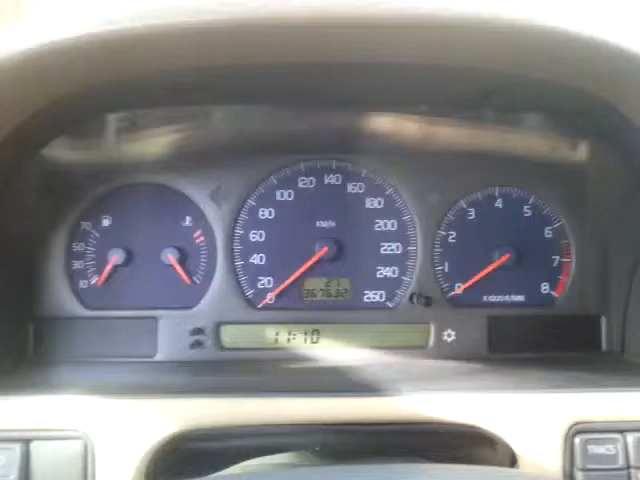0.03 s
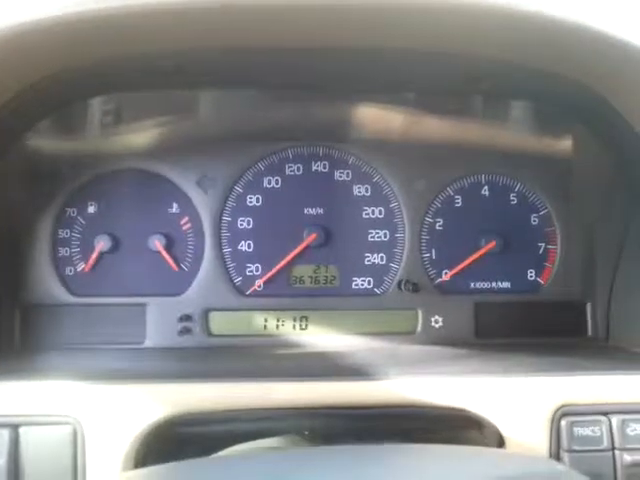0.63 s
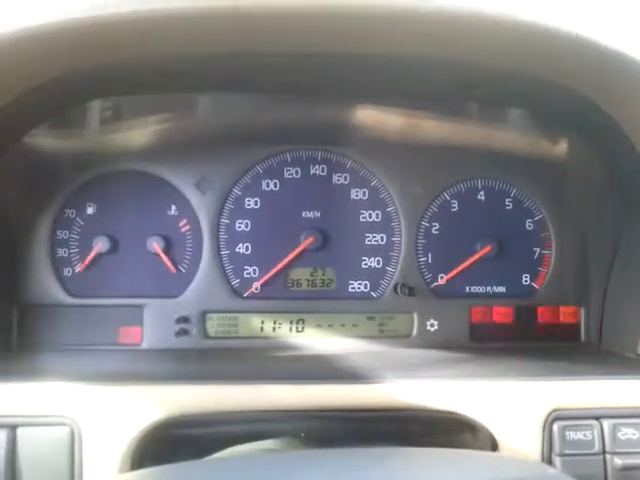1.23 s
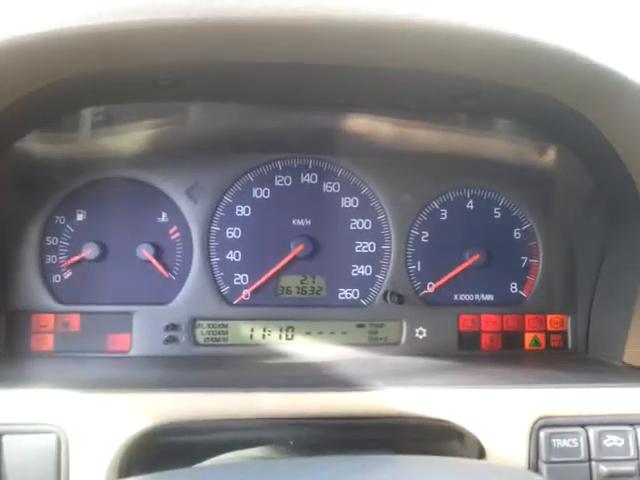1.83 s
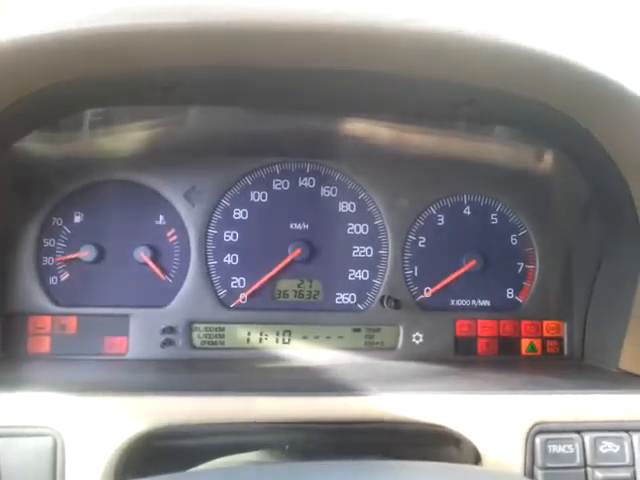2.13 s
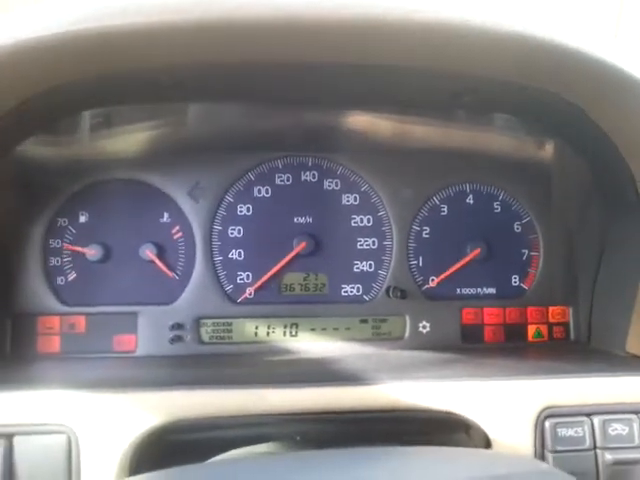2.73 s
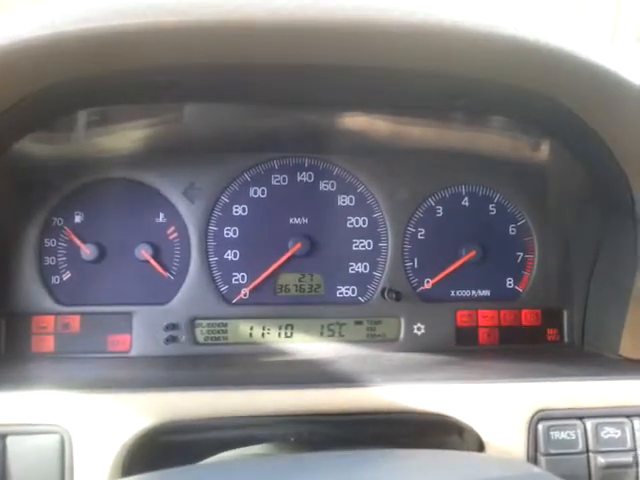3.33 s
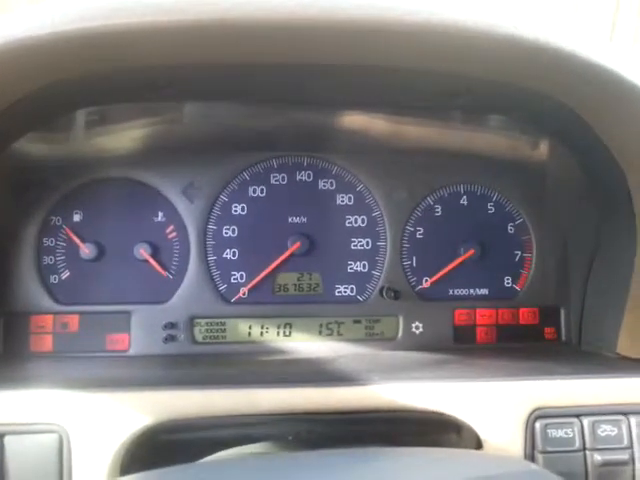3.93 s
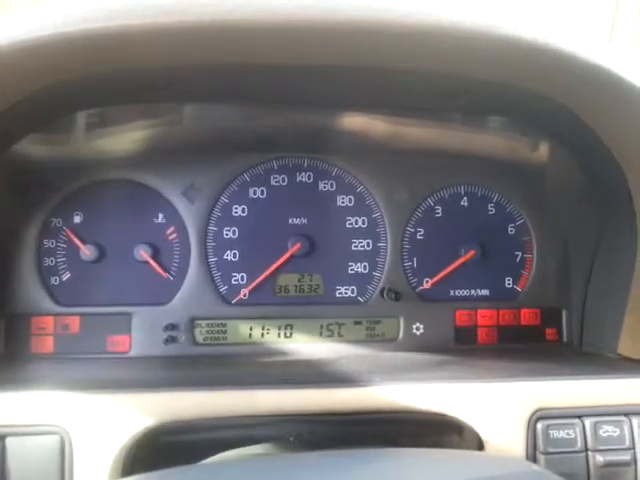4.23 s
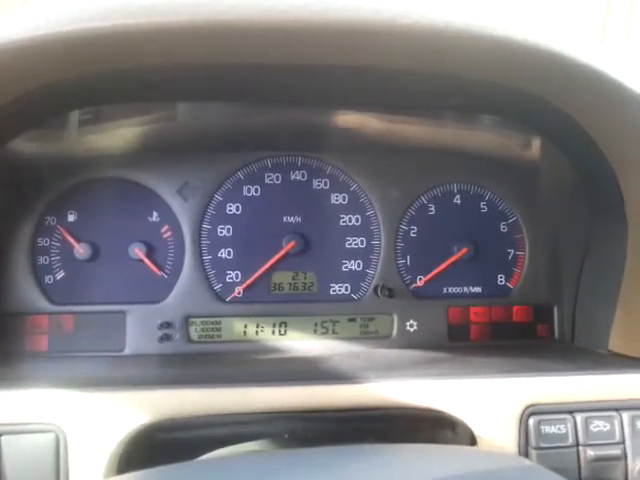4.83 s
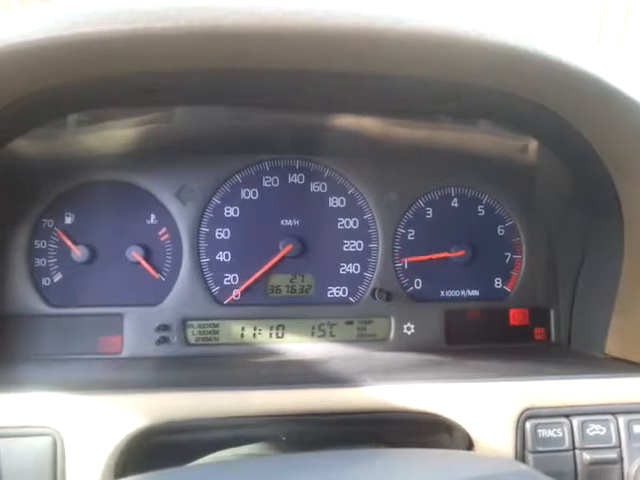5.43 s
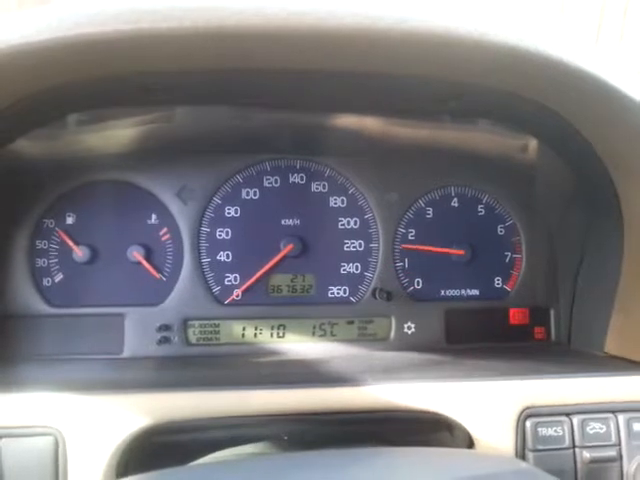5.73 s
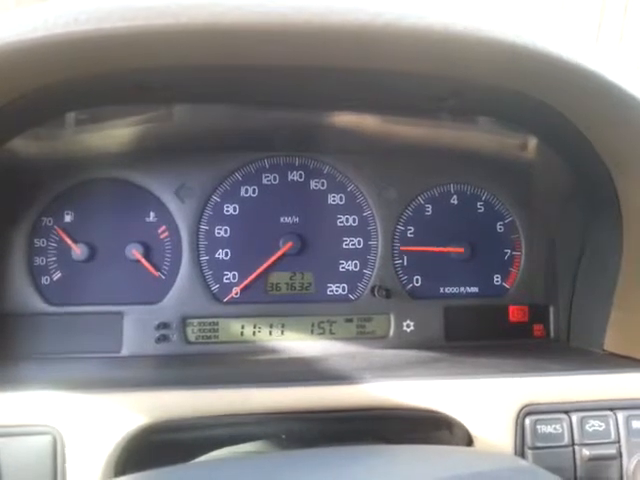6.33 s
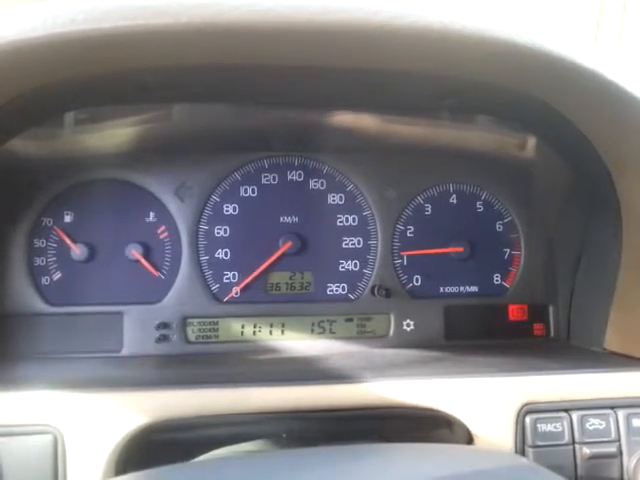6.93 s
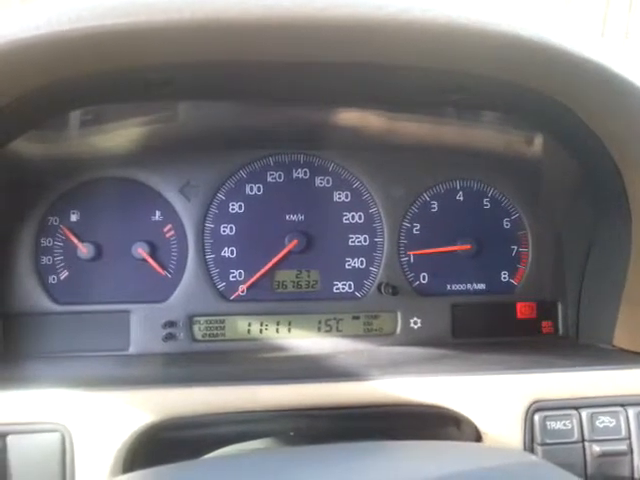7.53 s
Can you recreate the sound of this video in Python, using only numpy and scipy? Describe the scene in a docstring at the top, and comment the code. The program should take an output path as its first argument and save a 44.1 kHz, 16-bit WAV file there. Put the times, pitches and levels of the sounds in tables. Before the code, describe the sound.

Inside a closed car, over a faint low rumble, a key turns in the ignition with a quick run of sharp clicks and a small jingle, close and slightly left. A faint fuel pump whine, soft bumps and a light cloth rustle fill the pause. Then the starter clunks in and cranks briefly, and the petrol engine catches, flares with a low boom and sinks to a steady idle.

```python
"""Car start from the driver's seat

The ignition key turns through its detents, close by and brighter on the left; the key ring jingles.
The fuel pump primes. After a pause the starter engages and cranks; a five-cylinder petrol engine
catches, flares and sinks to a fast idle. The closed cabin booms as the firing harmonics glide
through its resonances."""
import sys
import numpy as np
from scipy import signal
from scipy.fft import rfft, irfft, next_fast_len
from scipy.io import wavfile
from scipy.ndimage import map_coordinates

SR = 44100
rng = np.random.default_rng(int(sys.argv[2]) if len(sys.argv) > 2 else 0)


def bounce(signal):
    """Save signal as a 16-bit WAV file at the path given by the first command-line argument."""
    frames = np.transpose(np.atleast_2d(signal))
    limited = np.clip(frames, -1, 1)
    pcm = np.round(limited * 32767).astype(np.int16)
    wavfile.write(sys.argv[1], SR, pcm)


N = 334278

STEREO_CORRELATION = [(150, 0.93), (350, 0.61), (700, 0.47), (1300, 0.0226), (3000, 0.014), (10000, 0.032)]  # cabin sound field: f/Hz, left-right correlation
LOCK_BALANCE = [(200, -3), (900, -1.5), (1300, 0.5), (2300, 10.5), (4300, 10), (14000, 12)]  # lock direction: f/Hz, left minus right/dB
ENGINE_BALANCE = [(200, -1), (700, -2), (1050, 1), (1400, 6.5), (2300, 8.5), (4300, 12), (9000, 3.5)]  # engine direction: f/Hz, left minus right/dB

OUTDOOR_SPECTRUM = [(18, -62), (30, -27), (75, -27), (94, -29), (113, -3.5), (131, -2.5), (147, -12),
                    (194, 1), (256, -7.5), (349, -2.5), (462, -12.5), (501, -11), (684, -7.5), (1500, -18),
                    (1950, -45), (3300, -120)]  # muffled rumble: f/Hz, density/dB
CABIN_MODES = [(115, 6.8, 0), (190.5, 8.1, -15), (299.4, 9.1, -6.5), (512, 12, -5), (888, 46, -11.5)]  # standing waves: f/Hz, width/Hz, gain/dB
HISS_SPECTRUM = [(880, -33), (1500, 0), (1600, -1), (2400, -3), (2760, -1), (3130, -2), (3610, -4.5),
                 (5660, -13.5), (13900, -9), (14700, -15.5)]  # background hiss: f/Hz, density/dB
HISS_ENVELOPE = [(3.4, -56), (3.9, -57), (4.5, -57.5), (6.0, -57)]  # hiss sinks slightly before the start: t/s, level/dB

# lock and starter drive contacts:
# t/s, level/dB, knock offset/dB, sheen offset/dB, ring f/Hz, ring offset/dB, t60/s
CLACK_HITS = [(0.9925, -35.5, 5, -14, 3600, -5.5, 0.0596), (1.006, -42, 10.5, -7, 3060, -10, 0.065),
              (1.018, -42, 11, -14, 1750, -6, 0.053), (1.036, -41, 4, -14, 2000, -3.5, 0.037),
              (1.052, -35.5, 4, -17, 4060, -9, 0.0406), (1.074, -40, 4, -10, 3100, -14, 0.027),
              (1.0943, -27, -2, -15, 3000, -16, 0.13), (1.1303, -22, 2.5, -4, 4170, -6, 0.11),
              (1.145, -18, 2.5, -8, 3720, -7, 0.064), (1.179, -22.5, -4, -12, 2980, -16, 0.05),
              (1.1837, -23, -5.5, -7, 2040, -14, 0.038), (1.21, -41.5, -14, 2, 2750, 1, 0.065),
              (1.2519, -27.5, -5.5, -10, 2850, -17, 0.0504), (1.2565, -29.5, -14.5, 2, 3350, -14, 0.055),
              (1.3348, -33.5, -5.5, -11.5, 3220, -12, 0.031), (1.3672, -53.5, 4.5, -8, 2700, -8, 0.033),
              (1.402, -41, 1.5, -6.5, 2030, -4.5, 0.05), (1.443, -51, 1, -2, 3530, -10, 0.074),
              (4.428, -39, -1.5, -16, 2200, -14, 0.08), (4.4484, -29.5, -0.5, -32, 3900, -8, 0.051),
              (4.4704, -30, -5, -29, 2150, -19, 0.094), (4.4815, -34, -12, -20, 2400, -17, 0.077),
              (4.4945, -38.5, -4, -17, 3580, -9, 0.05), (4.9065, -41.5, 7, -26, 2190, -16, 0.06),
              (5.0374, -36, 5, -9, 2080, -8, 0.25), (5.0751, -27.5, 2, -23, 2360, -9, 0.11),
              (5.1715, -31, 5.5, -10, 1250, -14, 0.046), (5.192, -28, -7, -8, 4170, -10.5, 0.056),
              (5.2515, -40.5, -1, -14, 2170, -4, 0.035)]
BARREL_MODES = [(2000, 590, 10), (2660, 640, 12), (3150, 620, 10), (3860, 400, 7), (4060, 196, 8.5),
                (4670, 1340, 4)]  # lock barrel: f/Hz, width/Hz, gain/dB
SHROUD_MODES = [(225, 210, -14.5), (378, 230, -5.5), (512, 38, 4), (660, 160, -2), (840, 130, -5),
                (952, 60, -2.5), (1267, 28.5, 3.5), (1416, 31, -5)]  # plastic column shroud: f/Hz, width/Hz, gain/dB
SHEEN_SPECTRUM = [(3500, -48), (5500, -1), (7200, 6), (8500, 3.5), (10500, 1), (14500, -2.5)]  # metallic sheen: f/Hz, density/dB
# steering lock gives; pinion slams in, settles, slips, snaps out: t/s, level/dB, f/Hz, t60/s
CLUNK_HITS = [(1.003, -31.5, 507, 0.094), (1.074, -32, 560, 0.018), (1.149, -20, 712, 0.052),
              (1.148, -46, 114, 0.3), (4.4595, -17, 572, 0.02), (4.525, -34.5, 310, 0.035),
              (4.907, -36.5, 236, 0.21), (5.075, -24.5, 912, 0.025), (5.129, -30, 820, 0.017),
              (5.153, -28, 1110, 0.014), (5.174, -18, 660, 0.019)]
KEY_HITS = [(1.189, -32.5), (1.209, -33), (1.256, -14)]  # hanging keys touch: t/s, level/dB
KEY_MODES = [(3150, -33, 0.052), (7760, -20, 0.059), (8310, -2.5, 0.052), (8400, -12, 0.061),
             (9650, -17, 0.04), (10400, -23, 0.04), (12600, -22, 0.035), (13340, -24, 0.06)]  # ringing key: f/Hz, level/dB, t60/s

SLEEVE_SWELLS = [(1.67, .08, -55.5), (2.884, 0.087, -57), (3.137, .02, -59), (3.25, 0.034, -57)]  # sleeve movements: crest t/s, half length/s, level/dB
SLEEVE_SPECTRUM = [(900, -25), (2000, 2), (3500, 0.5), (6000, -11.5), (9000, -7.5), (14000, -20)]  # sliding cloth: f/Hz, density/dB
FOOTWELL_HITS = [(1.957, -40.5), (1.969, -45), (2.338, -41.5), (2.35, -41), (2.89, -52), (3.636, -45)]  # soft bumps: t/s, level/dB
FOOTWELL_SPECTRUM = [(50, -45), (110, 5.5), (210, 3), (320, 0), (600, -11), (1500, -20), (3000, -27),
                     (7000, -51)]  # bump colour: f/Hz, density/dB
DASH_TICKS = [(3.238, -54.5, 7860), (3.54, -50, 3700), (3.557, -42.5, 2800), (3.634, -47, 2880),
              (3.685, -45.5, 2740), (3.9436, -45, 2630), (5.368, -46, 1800), (5.4755, -33, 1730),
              (5.47, -42, 3340), (5.545, -35, 2400), (5.8086, -53, 2200), (5.9634, -43.5, 3630)]  # dashboard, louder when the engine shakes it: t/s, level/dB, f/Hz

# starter spins up, labours against compression, is outrun, coasts: t/s, rotation/Hz
STARTER_SPEED = [(4.44, 40), (4.5, 90), (4.56, 120), (4.62, 138), (4.725, 151), (4.75, 135), (4.77, 121),
                 (4.8, 113), (4.88, 104), (4.94, 115), (5.2, 190), (5.5, 113)]
# loud on engaging, surges while cranking, swells as the engine catches, fades: t/s, level/dB
STARTER_ENVELOPE = [(4.44, -26.5), (4.5, -36.5), (4.56, -41.5), (4.68, -38.5), (4.775, -34), (4.84, -42),
                    (4.895, -43.5), (4.93, -35.5), (4.98, -36), (5.2, -31), (5.5, -49.5)]
WHINE_ORDERS = [(2, -3), (5, -1), (7, 0), (9, -3), (16, -13), (19, -9), (21, -12)]  # gears and commutator: multiple of rotation, level/dB
GEAR_SPECTRUM = [(60, -55), (115, -2.5), (160, -13), (230, -5.5), (310, 1.5), (455, -16), (620, -6),
                 (1020, -14), (1450, -17), (2200, -18.5), (3500, -21.5), (5700, -29.5), (9000, -31),
                 (14500, -62)]  # grinding teeth: f/Hz, density/dB
HOUSING_MODES = [(960, 170, 8), (1344, 31, 3.5), (2190, 80, -2.5), (2870, 95, 6), (3105, 37, 0),
                 (4040, 40, 4.5)]  # bell housing: f/Hz, width/Hz, gain/dB
BLOCK_JOLTS = [(4.483, -48, -51), (5.024, -29, -37), (5.095, -45, -28.5), (5.205, -35, -24)]  # first heave and hard firings: t/s, mount level/dB, cabin level/dB
JOLT_MODES = [(53.5, 0.26), (112.3, 0.41)]  # mount mode, then cabin mode: f/Hz, t60/s

FIRING_RATE = [(4.92, 32), (5.06, 47), (5.14, 49), (5.2, 52), (5.25, 60.5), (5.31, 67), (5.39, 75.3),
               (5.495, 78.3), (5.55, 72.3), (5.66, 69.3), (5.75, 65.9), (5.88, 62.8), (6.0, 59.3),
               (6.23, 49.9), (6.38, 48.6), (6.5, 48.1), (6.88, 45.6), (7.1, 44.8), (7.58, 43.7)]  # engine catches, flares, settles: t/s, f/Hz
ENGINE_LOAD = [(4.95, -8), (5.08, -8), (5.2, 2), (5.32, 1), (5.47, 0.5), (5.54, -2), (5.63, 1.5), (5.72, 1),
               (5.83, 3), (5.92, -.5), (6.06, -1), (6.2, -9.5), (6.6, -5.5), (7.58, -7.5)]  # firing strength: t/s, load/dB
FIRING_HARMONICS = [0, 3, .5, 1, -5]  # harmonics 1 to 5: level/dB
BOOM_RESPONSE = [(44, -53), (58, -45), (72, -53), (88, -58), (96, -47), (103, -40), (116, -35), (134, -54),
                 (148, -45), (155, -37), (163, -42), (175, -32), (184, -30), (197, -27.5), (209, -27.5),
                 (220, -38), (232, -45), (268, -52), (290, -40), (302, -29.5), (309, -28.5), (321, -32),
                 (334, -41), (350, -43), (380, -39)]  # cabin resonances under the firing harmonics: f/Hz, level/dB
BOOM_DIPS = [(5.863, -10), (5.955, -24)]  # brief dips as the revs fall: t/s, gain/dB
CABIN_TRANSFER = [(45, -44), (80, -35), (96, -12.5), (112, 1), (140, -27), (175, -5.5), (203, 4), (228, -2),
                  (260, -12), (312, -0.5), (365, -11), (440, -12.5), (540, -35), (750, -20), (1100, -40)]  # path of the engine's pulses: f/Hz, gain/dB
UNEVEN_ORDERS = [(7, 9), (8, 8), (9, 7), (11, 3), (12, 0), (13, 3), (14, 3), (18, -2), (21, -4), (22, 7),
                 (23, 1), (24, -3), (30, 2), (32, 6), (33, 6), (34, 6), (35, 5), (37, 6), (38, 6), (40, 3),
                 (43, 6), (46, 3), (51, 5), (84, 4)]  # unequal cylinders: order of the two-turn cycle, gain/dB
CLATTER_SPECTRUM = [(240, -25.5), (400, -7), (451, -0.5), (532, -11.5), (637, -10.5), (752, -8),
                    (1030, -10.5), (1550, -19.5), (1800, -20.5), (2460, -21.5), (5890, -37.5), (10900, -38),
                    (14500, -50)]  # valve clatter: f/Hz, density/dB
TAPPET_SPECTRUM = [(700, 5), (1700, 3), (3200, -8), (5500, -21), (12000, -28.5)]  # valve taps: f/Hz, density/dB
BLOCK_MODES = [(749, 30, 4), (900, 50, -0.5), (1139, 40, -2.5), (1222, 38, -1), (1410, 26, -3),
               (1575, 12, 0.5), (1707, 28, -5.5)]  # block and bulkhead: f/Hz, width/Hz, gain/dB
CLUTCH_SPECTRUM = [(800, -21), (2500, 6), (4500, -3), (6000, -1), (9000, 1), (11500, -4.5), (14500, -18.5)]  # clutch whirr and key swish: f/Hz, density/dB

CYLINDERS, IDLE_HZ = 5, 45
OVERRUN_S, KEY_RELEASE_S = 5.0, 5.222


def amp(db):
    """Decibels to gain."""
    return 10 ** (np.asarray(db) / 20)


def unit(x):
    """x at rms 1."""
    return x / np.sqrt(np.mean(x ** 2) + 1e-20)


def unit_hit(x):
    """x at rms 1 over its first 20 ms."""
    return x / np.sqrt(np.mean(x[:, :SR // 50] ** 2))


def along(points, hz):
    """(f/Hz, value) points read on a log axis."""
    f, values = np.transpose(points)
    return np.interp(np.log(hz + 1), np.log(f + 1), values)


def curve(points):
    """(t/s, value) points read at every sample."""
    return np.interp(np.arange(N) / SR, *np.transpose(points))


def ramp(start_s, length_s):
    """Linear rise from 0 to 1."""
    return np.clip((np.arange(N) / SR - start_s) / length_s, 0, 1)


def decay(t, t60_s):
    """Exponential fall, 60 dB in t60_s."""
    return np.exp(-np.log(1000) * t / t60_s)


def wobble(rate_hz, size=N):
    """Smooth random curve through Gaussian knots."""
    knots = rng.standard_normal(int(size * rate_hz / SR) + 4)
    coarse = np.linspace(0, size, 4096)
    return np.interp(np.arange(size), coarse, map_coordinates(knots, [coarse * rate_hz / SR]))


def filtered(x, response):
    """x through a complex frequency response."""
    size = x.shape[-1]
    padded = next_fast_len(size + 8192)
    return irfft(rfft(x, padded) * response(np.fft.rfftfreq(padded, 1 / SR)), padded)[..., :size]


def coloured(x, spectrum):
    """x shaped by (f/Hz, gain/dB) points."""
    return filtered(x, lambda hz: amp(along(spectrum, hz)))


def resonate(x, modes):
    """x through (f/Hz, width/Hz, gain/dB) resonances of alternating sign."""
    return filtered(x, lambda f: sum(
        (-1) ** k * amp(db) * 1j * f * width / (hz * hz - f * f + 1j * f * width)
        for k, (hz, width, db) in enumerate(modes)))


def cabin_noise(size=N):
    """White stereo noise, correlated in the bass, diffuse in the treble."""
    def mid_side_gains(hz):
        angle = np.arccos(np.clip(along(STEREO_CORRELATION, hz), -1, 1)) / 2
        return np.array([np.cos(angle), np.sin(angle)])
    mid, side = filtered(rng.standard_normal((2, size)), mid_side_gains)
    return np.array([mid + side, mid - side])


def placed(x, balance):
    """x panned per frequency."""
    return filtered(x, lambda hz: amp(np.outer([.5, -.5], along(balance, hz))))


def burst(t60_s, rise_s, tail_db, tail_t60_s):
    """Contact smeared by close reflections, with a faint cabin tail."""
    t = np.arange(SR // 4) / SR
    fall = decay(t, t60_s) + amp(tail_db) * decay(t, tail_t60_s)
    return cabin_noise(len(t)) * (1 - np.exp(-t / rise_s)) * fall


def add(track, start_s, sound):
    """Mix sound into track."""
    part = track[:, round(start_s * SR):][:, :sound.shape[-1]]
    part += sound[..., :part.shape[-1]]


def background(rumble_db=-49.5, hum_db=-56.0):
    """Outdoor rumble, muffled by the cabin and humming in its standing waves, plus hiss."""
    rumble = amp(rumble_db) * unit(coloured(cabin_noise(), OUTDOOR_SPECTRUM))
    hum = amp(hum_db) * unit(resonate(cabin_noise(), CABIN_MODES))
    drift = amp(0.63 * wobble(9))
    hiss = amp(curve(HISS_ENVELOPE)) * unit(coloured(cabin_noise(), HISS_SPECTRUM))
    return (rumble + hum) * drift + hiss


def clacks(barrel_db=-6.0, shroud_db=-4, sheen_trim_db=-5, ring_width_hz=380,
           rebound_s=0.0105, rebound_db=-11):
    """Lock and starter contacts ring the barrel, knock the shroud, throw a sheen and rebound once."""
    out = np.zeros((2, N))
    rebounds = [(s + rebound_s, db + rebound_db, *colour) for s, db, *colour in CLACK_HITS]
    for start_s, db, knock_db, sheen_db, ring_hz, ring_db, t60_s in CLACK_HITS + rebounds:
        blow = burst(t60_s, rise_s=0.00028, tail_db=-28.5, tail_t60_s=0.9)
        barrel = amp(barrel_db) * unit_hit(resonate(blow, BARREL_MODES))
        ring = amp(ring_db) * unit_hit(resonate(blow, [(ring_hz, ring_width_hz, 0)]))
        knock = amp(knock_db + shroud_db) * unit_hit(resonate(blow, SHROUD_MODES))
        sheen = amp(sheen_db + sheen_trim_db) * unit_hit(coloured(blow, SHEEN_SPECTRUM))
        add(out, start_s, amp(db) * (barrel + ring + knock + sheen))
    return placed(out, LOCK_BALANCE)


def clunks(rise_s=0.0012):
    """Heavy metal blows reach the cabin as short, dull tones."""
    out, t = np.zeros((2, N)), np.arange(SR // 4) / SR
    attack = 1 - np.exp(-t / rise_s)
    for start_s, db, hz, t60_s in CLUNK_HITS:
        add(out, start_s, 2 * amp(db) * np.sin(2 * np.pi * hz * t) * attack * decay(t, t60_s))
    return out


def keys(swell_s=0.0097, side_db=7, trim_db=4):
    """A hanging key chatters against its neighbour, so its ring swells before it dies."""
    out, t = np.zeros((2, N)), np.arange(SR // 4) / SR
    swell = 1 - np.exp(-t / swell_s)
    for start_s, db in KEY_HITS:
        ring = sum(amp(mode_db + rng.normal(0, 1)) * decay(t, t60_s) * np.sin(2 * np.pi * hz * t)
                   for hz, mode_db, t60_s in KEY_MODES)
        add(out, start_s, 2 * amp(db + trim_db) * ring * swell)
    return out * amp([[side_db], [-side_db]])


def fuel_pump(start_s=1.3, run_s=1.9, whine_hz=690, level_db=-63, waver=0.0078, flutter_db=3.0):
    """Faint, unsteady whine from the tank while fuel pressure builds."""
    phase = 2 * np.pi * np.cumsum(whine_hz * (1 + waver * wobble(30))) / SR
    running = ramp(start_s, 0.64) * (1 - ramp(start_s + run_s, .5))
    return np.sqrt(2) * amp(level_db + flutter_db * wobble(8.04)) * running * np.sin(phase)


def sleeve(grain_db=3):
    """The driver's sleeve slides in soft, grainy swells."""
    t = np.arange(N) / SR
    swells = sum(amp(db) * np.exp(-((t - s) / half_s) ** 2) for s, half_s, db in SLEEVE_SWELLS)
    return swells * unit(coloured(cabin_noise() * amp(grain_db * wobble(120)), SLEEVE_SPECTRUM))


def footwell_bumps(t60_s=0.059):
    """Soft, dull blows in the footwell."""
    out = np.zeros((2, N))
    for start_s, db in FOOTWELL_HITS:
        blow = burst(t60_s, rise_s=0.0055, tail_db=-15.5, tail_t60_s=0.29)
        add(out, start_s, amp(db) * unit_hit(coloured(blow, FOOTWELL_SPECTRUM)))
    return out


def dashboard_ticks(trim_db=-9, width_hz=1300):
    """Small contacts, each ringing one broad panel resonance."""
    out = np.zeros((2, N))
    for start_s, db, hz in DASH_TICKS:
        panel = [(hz, width_hz, 0)]
        blow = burst(t60_s=0.03, rise_s=.003, tail_db=-13, tail_t60_s=0.17)
        add(out, start_s, amp(db + trim_db) * unit_hit(resonate(resonate(blow, panel), panel)))
    return out


def starter(whine_db=-8, grind_db=-3.5, housing_db=-11, shake_db=-28, bite=0.1, jitter=0.0081):
    """Armature and gears whine; the pinion grinds, rings the housing and shakes the block."""
    phase = 2 * np.pi * np.cumsum(curve(STARTER_SPEED) * (1 + jitter * wobble(50))) / SR
    whine = sum(np.sin(k * phase + 0.7 * wobble(130)) * amp(db + 4 * wobble(40))
                for k, db in WHINE_ORDERS)
    teeth = cabin_noise() * (1 + bite * np.cos(phase)) * amp(0.96 * wobble(70))
    driving = 1 - ramp(OVERRUN_S, 0.13)  # gears go slack as the engine takes over
    grind = amp(grind_db) * unit(coloured(teeth, GEAR_SPECTRUM))
    housing = amp(housing_db) * unit(resonate(teeth, HOUSING_MODES))
    shake = amp(shake_db) * unit(resonate(teeth, [(51.4, 20, 0)]))  # mount resonance
    sound = amp(whine_db) * driving * unit(whine) + grind + housing + shake
    return placed(sound * amp(curve(STARTER_ENVELOPE)) * ramp(4.44, 0.013), ENGINE_BALANCE)


def jolts(rise_s=0.029):
    """The rocking block rings its mounts and the cabin's deepest resonance."""
    out, t = np.zeros((2, N)), np.arange(SR // 2) / SR
    attack = 1 - np.exp(-(t / rise_s) ** 2)
    for start_s, *levels_db in BLOCK_JOLTS:
        ring = sum(amp(db) * decay(t, t60_s) * np.sin(2 * np.pi * (hz * t + rng.random()))
                   for db, (hz, t60_s) in zip(levels_db, JOLT_MODES))
        add(out, start_s, 2 * ring * attack)
    return out


def boom(firings, firing_hz, load_db, dip_s=0.013):
    """Each firing harmonic swells as it crosses a cabin resonance; hard firing is rougher."""
    out, t = np.zeros(N), np.arange(N) / SR
    dips_db = sum(db * np.exp(-((t - s) / dip_s) ** 2) for s, db in BOOM_DIPS)
    for k, db in enumerate(FIRING_HARMONICS, 1):
        rough_db = amp(load_db) * (.9 * wobble(20) + 1.3 * wobble(70))
        drift_db = .7 * wobble(9)  # no two cycles burn alike
        level_db = db + load_db + dips_db + along(BOOM_RESPONSE, k * firing_hz) + rough_db + drift_db
        out += np.sqrt(2) * amp(level_db) * np.cos(2 * np.pi * k * firings)
    return out


def lope(cycles, firing_hz, beating_order=22):
    """Unequal cylinders fill in orders between the firing harmonics; one beats against the fourth."""
    start = int(FIRING_RATE[0][0] * SR)
    out, boost_db = np.zeros(N), dict(UNEVEN_ORDERS)
    boom_orders = {10, 15, 20, 25}
    for k in sorted((set(range(6, 56)) | set(boost_db)) - boom_orders):
        db = along(CABIN_TRANSFER, k * firing_hz[start:] / CYLINDERS) + boost_db.get(k, 0)
        offset_turns = 0 if k == beating_order else .33 * rng.standard_normal()
        gain = amp(db + 2 * wobble(6, size=N - start))
        out[start:] += gain * np.cos(2 * np.pi * (k * cycles[start:] + offset_turns))
    return out


def tappets(firings, scatter_db=4, t60_s=0.02):
    """Valves tap twice a firing, each with its own force."""
    taps = np.diff(np.floor(2 * firings), prepend=0) * amp(scatter_db * rng.standard_normal(N))
    envelope = signal.fftconvolve(taps, decay(np.arange(SR // 20) / SR, t60_s))[:N]
    return unit(coloured(cabin_noise() * envelope, TAPPET_SPECTRUM))


def valve_train(firings, firing_hz, load_db, pulsing, idle_db=-47, db_per_octave=10.5,
                block_db=-3.5, churn_db=2.8, tap_db=-13, tap_db_per_octave=10):
    """Valve clatter churns in the block's resonances; it grows with speed, slightly with load."""
    clatter = unit(coloured(cabin_noise() * pulsing * amp(1.6 * wobble(90)), CLATTER_SPECTRUM))
    ringing = unit(resonate(cabin_noise() * pulsing * amp(churn_db * wobble(25)), BLOCK_MODES))
    block = amp(block_db) * coloured(ringing, [(1800, 0), (3000, -18)])
    octaves = np.log2(firing_hz / IDLE_HZ)
    taps = amp(tap_db + tap_db_per_octave * octaves) * tappets(firings)
    return amp(idle_db + db_per_octave * octaves + 0.071 * load_db) * (clatter + taps + block)


def engine(lope_db=-46.0, rumble_db=-39, jitter=0.0013, strong_firing_s=7.08):
    """Five firings a cycle drive boom, lope, combustion rumble and valve clatter."""
    firing_hz, load_db = curve(FIRING_RATE), curve(ENGINE_LOAD)
    unevenness = jitter * amp(load_db) * wobble(20)
    firings = np.cumsum(firing_hz * (1 + unevenness)) / SR
    firings -= firings[int(strong_firing_s * SR)]  # phase zero on the strongest cylinder
    cycles = firings / CYLINDERS
    pulsing = 1 + 0.1 * np.cos(2 * np.pi * firings) + 0.065 * np.cos(2 * np.pi * cycles)
    rumble = unit(coloured(cabin_noise() * pulsing, CABIN_TRANSFER + [(2500, -62)]))
    sound = amp(rumble_db + 1.1 * load_db) * rumble
    sound += amp(lope_db + 0.53 * load_db) * lope(cycles, firing_hz)
    sound += valve_train(firings, firing_hz, load_db, pulsing)
    sound += boom(firings, firing_hz, load_db)
    return placed(sound * ramp(4.92, 0.14), ENGINE_BALANCE)


def starter_clutch(held_db=-48.5, rise_db_per_s=204, coast_db=-56, fall_db_per_s=47,
                   swish_db=-39, swish_s=0.013, rough_db=2, release_s=0.017):
    """The outrun one-way clutch whirrs; a bright swish as the key springs back, then the whirr fades."""
    t = np.arange(N) / SR
    released = ramp(KEY_RELEASE_S, release_s)
    held = amp(held_db - rise_db_per_s * np.maximum(OVERRUN_S - t, 0))
    coasting = amp(coast_db - fall_db_per_s * np.maximum(t - KEY_RELEASE_S, 0))
    swish = amp(swish_db) * np.exp(-((t - KEY_RELEASE_S) / swish_s) ** 2)
    whirr = unit(coloured(cabin_noise() * amp(rough_db * wobble(170)), CLUTCH_SPECTRUM))
    return placed(whirr * (held * (1 - released) + coasting * released + swish), LOCK_BALANCE)


def scene():
    """Stereo mix at the driver's seat."""
    small_sounds = clacks() + keys() + footwell_bumps() + dashboard_ticks() + sleeve() + fuel_pump()
    return small_sounds + clunks() + starter() + starter_clutch() + jolts() + engine() + background()


def record(dry, top_hz=14830):
    """Brief silence, quick fade-in, brick-wall low-pass."""
    return filtered(dry * ramp(0.12, 0.039), lambda hz: hz < top_hz)


dry = scene()
out = record(dry)
bounce(out)
```